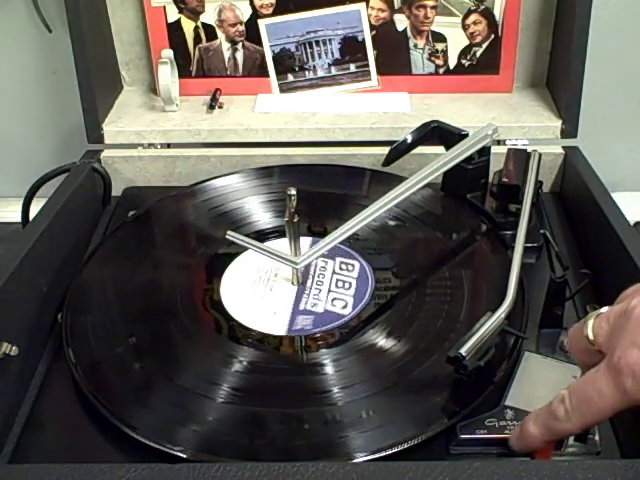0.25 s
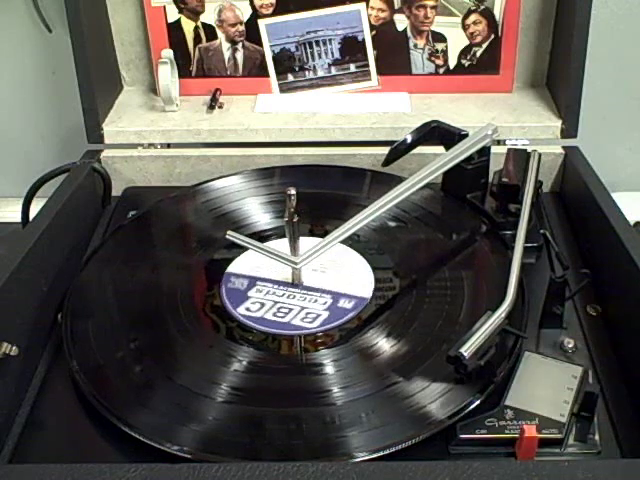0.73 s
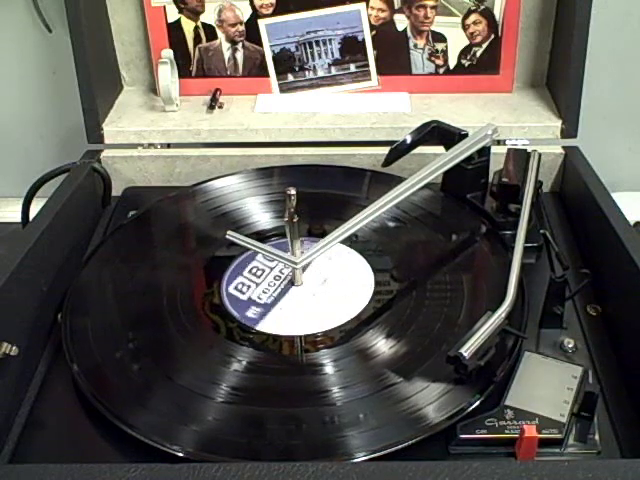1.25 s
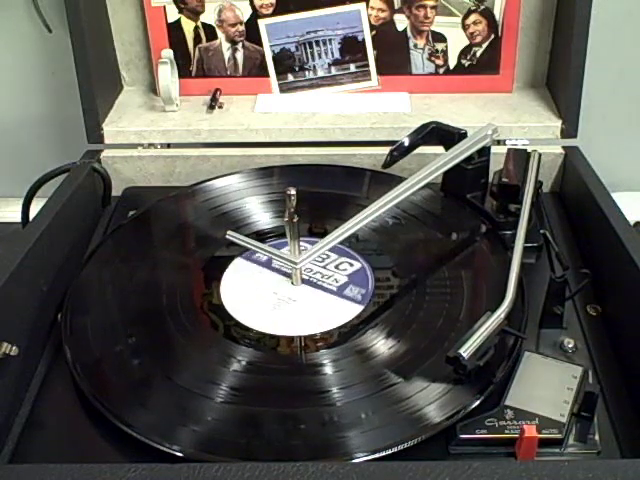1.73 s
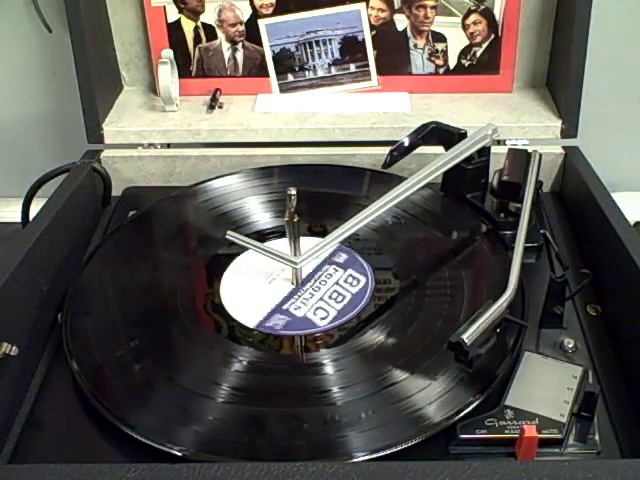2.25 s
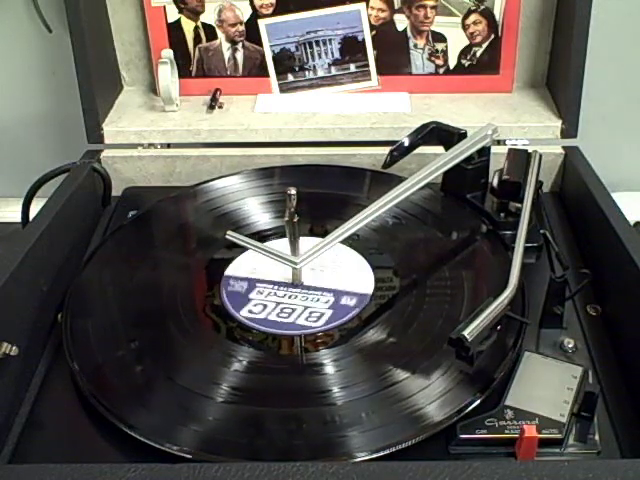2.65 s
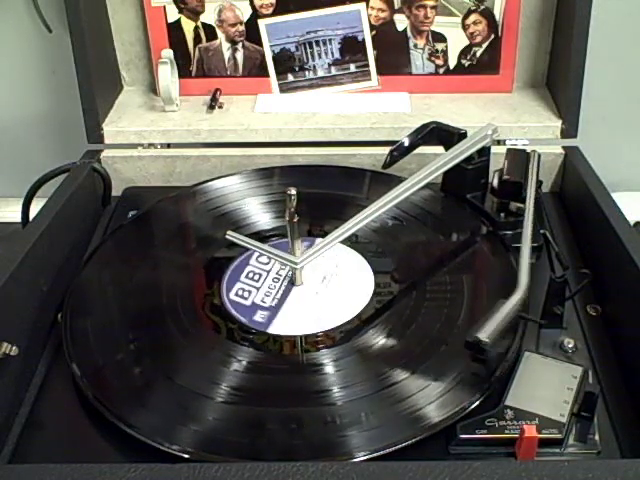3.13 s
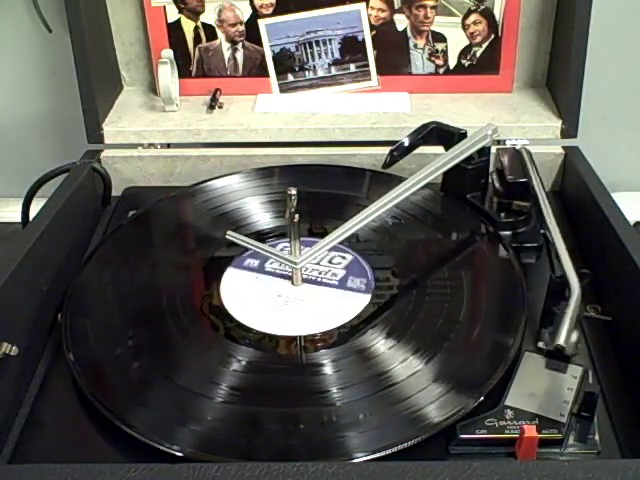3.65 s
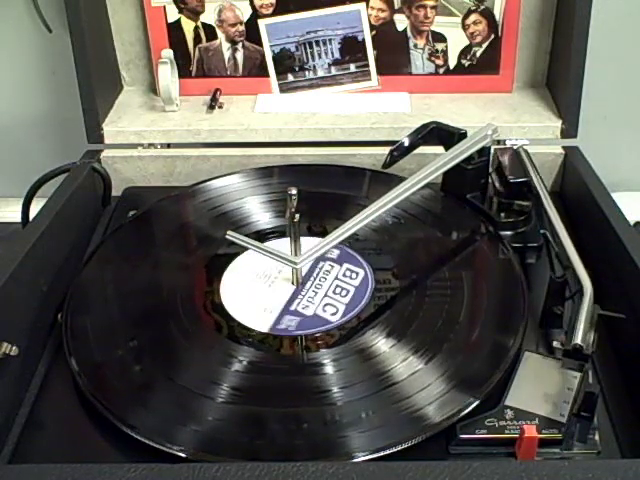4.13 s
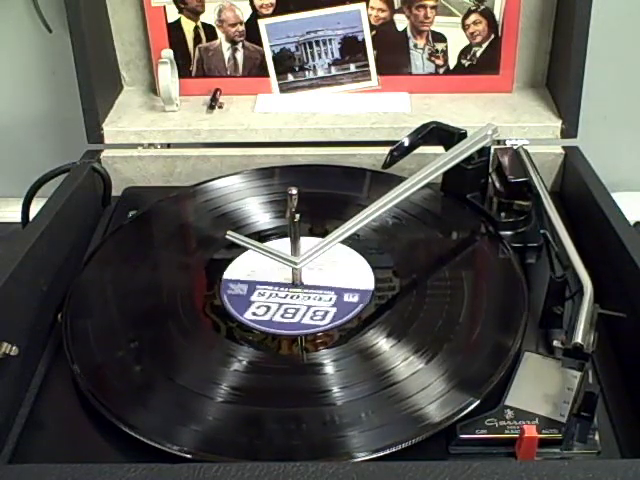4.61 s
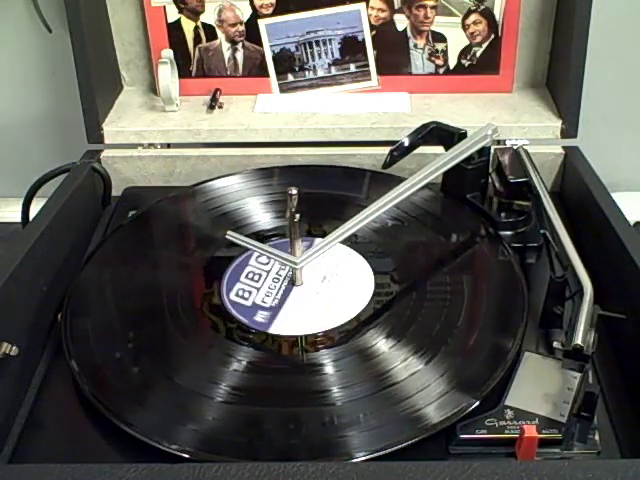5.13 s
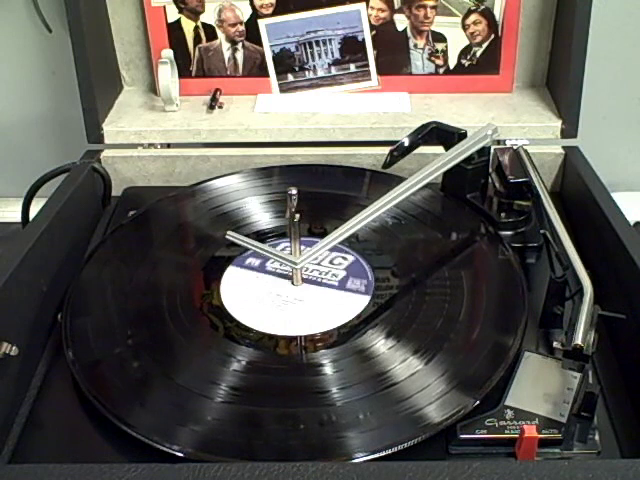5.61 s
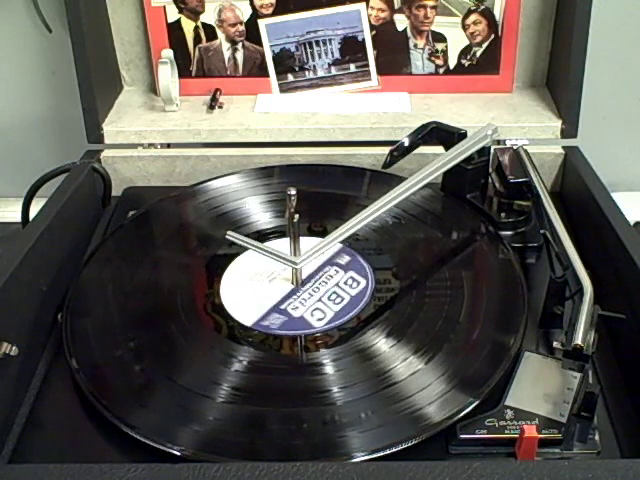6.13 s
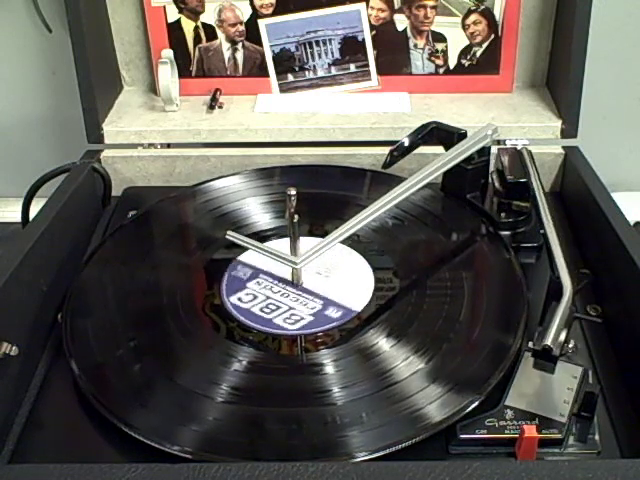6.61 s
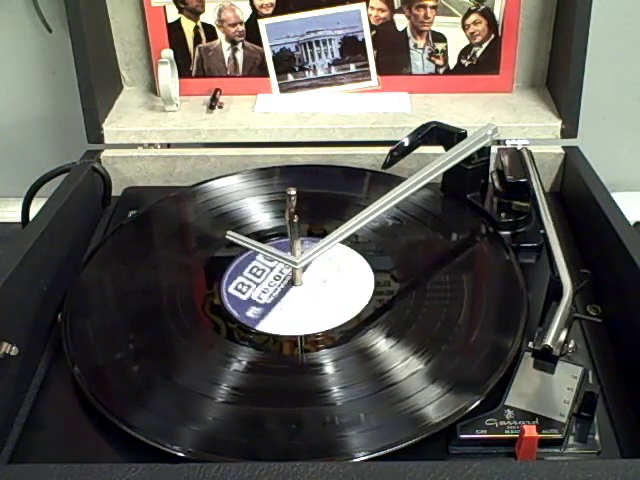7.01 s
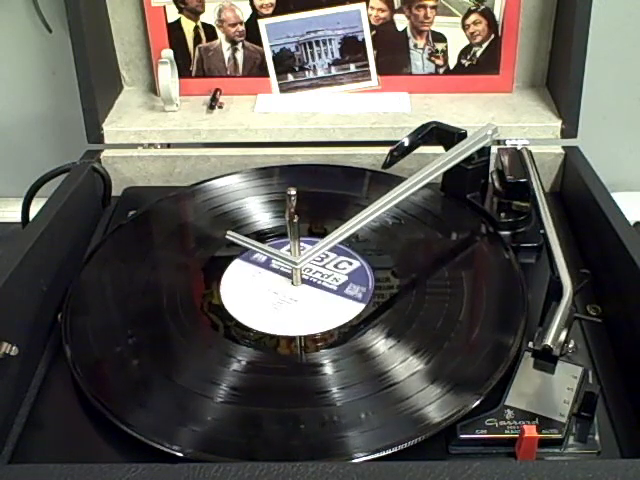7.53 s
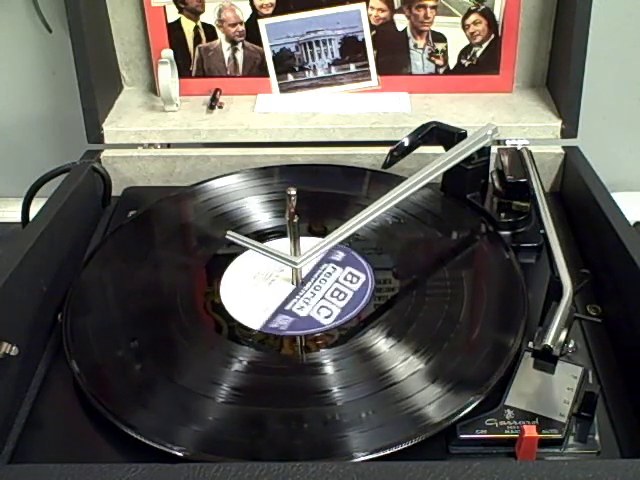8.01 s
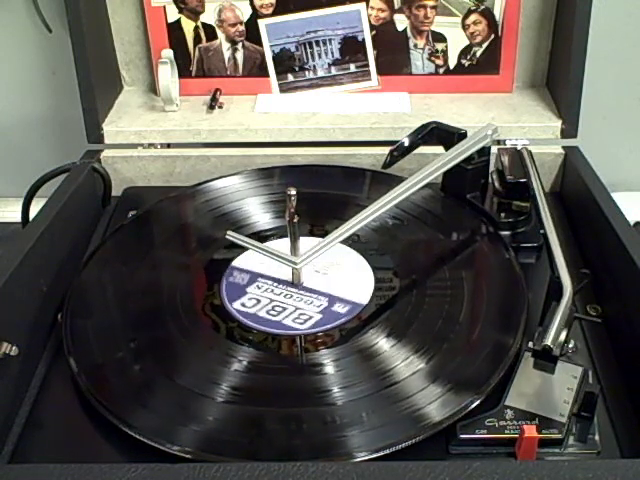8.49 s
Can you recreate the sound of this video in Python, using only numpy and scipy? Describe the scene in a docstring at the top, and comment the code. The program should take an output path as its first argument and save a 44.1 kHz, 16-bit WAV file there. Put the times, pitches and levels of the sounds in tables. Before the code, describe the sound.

Close indoors, small levers click over a grinding drive, followed by a dull thump, a bright arm clatter, a sharp snap and quiet humming.

```python
"""Automatic record deck returning its arm

A record deck runs through its return cycle, close to a small, nearly mono microphone indoors.
Levers tick, knock and rub, the sprung chassis thumps down, the arm clatters onto its rest and a latch snaps:
each blow mixes fading tones (modes) with fading, filtered noise. Below lie a humming, grinding drive made
of tones and filtered noise, a low drone of gliding tones, and microphone hiss made of filtered noise."""
import sys
import numpy as np
from scipy import signal
from scipy.fft import rfft, irfft
from scipy.io import wavfile

SR = 44100
rng = np.random.default_rng(int(sys.argv[2]) if len(sys.argv) > 2 else 0)


def dump_mix(stems):
    """Bounce the given channels to the path in sys.argv[1] as a 16-bit WAV at rate SR."""
    frames = np.atleast_2d(stems).T  # one column per channel
    limited = np.clip(frames, -1, 1)  # hard clip at full scale
    pcm = np.round(limited * 32767).astype(np.int16)
    wavfile.write(sys.argv[1], SR, pcm)


N = 386316
TIME = np.arange(N) / SR  # time of every sample, s
RING_S = np.arange(2 ** 15) / SR  # time since a blow, s

# ringing tones of the wooden case: (pitch [Hz], relative level [dB], time to fade by 60 dB [s])
CASE_MODES = [(135, -9, .1), (202, -4, .12), (295, 0, .12), (383, -3, .14), (466, -9, .1), (574, 0, .085),
              (660, -11, .06), (775, -19, .07), (854, -13, .08), (934, -14, .08)]
# ringing tones of the steel levers: (pitch [Hz], relative level [dB], time to fade by 60 dB [s])
LEVER_MODES = [(1317, -8, .07), (1606, 0, .06), (1799, -3, .08), (1937, -4, .1), (2166, -7, .09),
               (2309, -5, .09), (2726, -3, .1), (2972, -3, .11), (3122, -3, .1), (3272, -6, .1),
               (3700, -5, .12), (4606, -8, .06), (5380, -8, .05), (6378, -8, .05), (6880, -5, .07)]


def undb(db):
    """Turn decibels into a gain."""
    return 10 ** (np.asarray(db) / 20)


def unit(x):
    """Scale a sound to an rms (average strength) of 1."""
    return x / np.std(x)


def unit_attack(x):
    """Scale a blow to rms 1 over its first 10 ms."""
    attack = x[:SR // 100]
    return x / np.sqrt(np.mean(attack ** 2))


def curves(table):
    """Join the points of a table by straight lines: one value per sample for each column after the time."""
    times, *columns = np.transpose(table)
    return [np.interp(TIME, times, column) for column in columns]


def add(track, s, sound):
    """Mix a sound into the track at time s."""
    start = int(s * SR)
    track[start:start + len(sound)] += sound[:N - start]


def colour(x, points):
    """Filter a sound through (pitch [Hz], gain [dB]) points, with no response ahead of a blow."""
    hz, db = np.transpose(points)
    n = len(x)
    bins = np.maximum(np.fft.rfftfreq(n, 1 / SR), 1)
    gain_db = np.interp(np.log(bins), np.log(hz), db)
    # folding the cepstrum of the log gain onto positive times gives a minimum-phase filter
    cepstrum = irfft(np.log(undb(gain_db)), n)
    cepstrum[1:n // 2] *= 2
    cepstrum[n // 2 + 1:] = 0
    return irfft(rfft(x) * np.exp(rfft(cepstrum)), n)


def around(hz, below_db, above_db):
    """Filter points for a hump: flat for two thirds of an octave, sloping until two octaves either side."""
    return [(hz / 4, below_db), (hz / 1.25, 0), (hz * 1.25, 0), (hz * 4, above_db)]


def fade(t60):
    """Exponential decay that loses 60 dB in t60 seconds."""
    return np.exp(-np.log(1000) * RING_S / t60)


def modes(table, scatter_db=0, detune=0):
    """Fading tones of a struck body; each blow can vary their shares and, slightly, their pitches."""
    chance = rng.standard_normal((len(table), 2))
    ring = np.zeros(len(RING_S))
    for k, ((hz, db, t60), (level_luck, pitch_luck)) in enumerate(zip(table, chance)):
        tone = np.sin(2 * np.pi * hz * (1 + detune * pitch_luck) * RING_S)
        sign = (-1) ** k  # neighbours start in opposite directions
        ring += sign * undb(db + scatter_db * level_luck) * fade(t60) * tone
    return unit_attack(ring)


def clank(spectrum, t60, crack):
    """Filtered noise stands for countless close modes fading together, led by the crack of the contact."""
    ring = unit_attack(rng.standard_normal(len(RING_S)) * fade(t60))
    ring[0] += crack * np.sqrt(SR / 100)  # a single-sample click
    return unit_attack(colour(ring, spectrum))


def knock(centre_hz):
    """The wooden case swells into its ring; the place of the contact favours the modes near one pitch."""
    # how well a knock reaches the case: (pitch [Hz], gain [dB])
    knock_colour = [(135, -1.5), (200, 2.5), (295, 0.5), (383, -7), (466, 1.5), (574, 1), (700, -10),
                    (950, -1)]
    favour_db_per_octave = 13  # modes away from the centre ring less
    favoured = []
    for hz, db, t60 in CASE_MODES:
        octaves_away = abs(np.log2(hz / centre_hz))
        favoured.append((hz, db - favour_db_per_octave * octaves_away, t60))
    ring = modes(favoured, scatter_db=2, detune=.012)
    swell = 1 - fade(0.041)
    return unit_attack(swell * colour(ring, knock_colour))


def load():
    """Load on the drive, 0-1, easing from one stage of the cycle to the next."""
    # the lever is pushed, the drive idles round to the cam, the cam strains until the chassis drops,
    # the arm is swung, the drive runs free: (start [s], load [0-1])
    stages = [(0, .9), (.45, 0.7), (.9, 1), (2.05, .22), (3.6, 0)]
    settle_s = .13  # time constant of the easing
    effort = np.full(N, float(stages[0][1]))
    for s, share in stages[1:]:
        effort = share + (effort - share) * np.exp(-np.maximum(TIME - s, 0) / settle_s)
    return np.clip(effort, 0, 1)


def crackle(per_second):
    """Dry joints slip at random moments; each tiny slip is a burst of noise that dies away quickly."""
    slips = (rng.random(N) < per_second / SR) * undb(4 * rng.standard_normal(N))
    envelope = signal.fftconvolve(slips, fade(0.07))[:N]
    spectrum = [(800, -12.5), (2200, -6.5), (4400, 2.5), (5500, -7), (7200, -2.5), (10000, -12.5), (16000, -12)]
    return unit(colour(envelope * rng.standard_normal(N), spectrum))


def drive():
    """The motor hums steadily; grinding on the case, crackle and deep rumble grow with the load."""
    # motor hum: (pitch [Hz], rms level [dB])
    hum_lines = [(100, -76), (250, -76.5), (300, -76), (347, -76)]
    effort = load()

    def gain(free_db, loaded_db):
        """Level between running free and full load."""
        return undb(free_db + (loaded_db - free_db) * effort)

    # wheel and cam rub in grains whose strength changes every 1024 samples, and set the case ringing
    block_db = 3 * np.repeat(rng.standard_normal(N // 1024 + 1), 1024)[:N]
    grains = rng.standard_normal(N) * undb(block_db)
    grind = signal.fftconvolve(grains, modes(CASE_MODES))[:N]
    grind = colour(grind, [(130, -2.5), (260, 7.5), (400, -10), (600, 0), (1000, -12.5)])
    rumble = colour(rng.standard_normal(N), [(10, -19.0), (30, -0.5), (58, 5.0), (105, 0.5),
                                             (150, -16.0), (300, -27.0), (1000, -53)])
    hum = sum(undb(db) * np.sqrt(2) * np.sin(2 * np.pi * hz * TIME) for hz, db in hum_lines)

    out = gain(free_db=-77.5, loaded_db=-56) * unit(grind)
    out += gain(free_db=-79.5, loaded_db=-65) * crackle(per_second=57)
    out += gain(free_db=-59, loaded_db=-51) * unit(rumble)
    return out + hum


def waver(db, per_second):
    """A gain that wanders at random by about db decibels."""
    steps = rng.standard_normal(256)
    return undb(db * np.interp(TIME * per_second, np.arange(len(steps)), steps))


def drone():
    """A deep tone and its octave sink and climb again, like a far engine heard through the walls."""
    # path of the drone before its waver:
    # (time [s], pitch [Hz], level of the deep tone [dB], level of the octave [dB])
    path = [(0, 64.3, -50, -74), (.65, 68.5, -47, -71), (1.15, 60, -45.5, -64), (1.7, 59.95, -53, -57.5),
            (2.3, 53.3, -50.5, -69), (2.6, 48.6, -74, -77), (2.9, 44.8, -54, -63.5), (3.42, 31.7, -49, -55),
            (3.62, 30.3, -67, -67), (4.46, 26.85, -61.5, -64), (5.1, 31.07, -62, -55),
            (5.22, 44.7, -48.5, -63), (5.75, 37.66, -50.5, -63), (6.15, 40.15, -53, -48.5),
            (6.45, 44.14, -48, -59.5), (6.9, 47.44, -57, -58.5), (8.38, 55.8, -59, -57),
            (8.62, 58.4, -45.5, -59.5)]
    # weaker lines on both sides of the octave: (multiple of the pitch, level against the octave [dB])
    side_lines = [(1.75, -7), (2.25, -9)]
    hz, first_db, octave_db = curves(path)
    phase = 2 * np.pi * np.cumsum(hz) / SR

    def line(multiple):
        """One tone, wavering in level on its own."""
        return np.sqrt(2) * waver(db=2, per_second=7) * np.sin(multiple * phase)

    octave = line(2) + sum(undb(db) * line(multiple) for multiple, db in side_lines)
    return undb(first_db) * line(1) + undb(octave_db) * octave


def hiss():
    """Smooth microphone hiss: filtered noise at a steady level."""
    # colour of the hiss: (pitch [Hz], relative level [dB])
    hiss_colour = [(88, -27), (150, -1), (217, -8.5), (291, -2), (376, -11), (398, -11.5), (774, -12),
                   (1060, -16), (2220, -16), (3100, -19), (14000, -21.5), (16000, -20.5)]
    return undb(-60.5) * unit(colour(rng.standard_normal(N), hiss_colour))


def lever_clicks(rows):
    """Each small contact rings the steel, rebounds a moment later, ticks in the treble and knocks the case."""
    # colour of the treble tick: (pitch [Hz], relative level [dB])
    tick_colour = [(1500, -21), (4000, -11.5), (7000, -0.5), (10000, -6.5), (13500, -5), (16000, -19)]
    # a harder contact rings the steel higher: centre when tick and steel are equal, and the
    # hardness that raises it by an octave
    equal_hz, hardness_db_per_octave = 3020, 24.5
    steel_colour = [(200, -4.5), (900, 2.5), (1400, 8.0), (16000, 5.0)]
    out = np.zeros(N)
    for s, steel_db, hardness_db, case_db, case_hz in rows:
        steel_hz = equal_hz * 2 ** (hardness_db / hardness_db_per_octave)
        ring = modes(LEVER_MODES, scatter_db=4, detune=.03)
        steel = clank(steel_colour, t60=0.058, crack=0.091) + undb(-17) * ring
        steel = colour(steel, around(steel_hz, below_db=-12, above_db=-22.5))
        steel = undb(steel_db) * unit_attack(steel)
        rebound_s = s + rng.uniform(0.00158, 0.0049)
        tick = clank(tick_colour, t60=0.048, crack=0.39)
        add(out, s, steel)
        add(out, rebound_s, undb(-19.5) * steel)
        add(out, s, undb(steel_db + hardness_db) * tick)
        add(out, s, undb(case_db) * knock(case_hz))
    return out


def stray_clicks(hardness_db):
    """Rows of faint clicks that come at random, more often under load."""
    per_second = 5  # under full load
    steel_db, case_db, spread_db, case_hz = -67.5, -55.5, 3, 275  # typical levels at full load
    times = np.flatnonzero(rng.random(N) < per_second * load() / SR) / SR
    spread = spread_db * rng.standard_normal((len(times), 2))
    return [(s, steel_db + a, hardness_db, case_db + b, case_hz) for s, (a, b) in zip(times, spread)]


def rubs():
    """Parts slide in tiny uneven slips, each stroke ringing one resonance of the linkage."""
    # rubs and squeaks, levels before the stroke shapes them:
    # (time [s], length [s], centre [Hz], width [Hz], level [dB])
    strokes = [(0.182, 0.069, 1900, 900, -55.5), (2.271, .06, 2050, 220, -57), (2.275, 0.072, 420, 35, -56),
               (2.344, 0.077, 2370, 1000, -62.5), (2.42, 0.68, 2170, 300, -72), (3.12, 0.43, 488, 170, -58),
               (3.349, 0.048, 2735, 1300, -57), (6.352, 0.058, 2320, 2000, -61.5),
               (7.373, .05, 2270, 1200, -66), (8.35, 0.073, 3000, 2000, -67)]
    out = np.zeros(N)
    for s, length, hz, width_hz, db in strokes:
        slips = rng.standard_normal(len(RING_S)) * undb(12 * rng.standard_normal(len(RING_S)))
        ring = RING_S * np.exp(-np.pi * width_hz * RING_S) * np.cos(2 * np.pi * hz * RING_S)
        squeak = unit(signal.fftconvolve(slips, ring)[:len(RING_S)])
        # swells quickly, sinks more slowly
        stroke = np.sin(np.pi * np.sqrt(np.minimum(RING_S / length, 1)))
        add(out, s, undb(db) * stroke * squeak)
    return out


def chassis_drop():
    """The chassis falls onto its springs and booms in the case, which it damps as it settles."""
    # light knocks ahead of the drop, then the drop and its bounces;
    # spring and case levels are those before the boom is filtered:
    # (time [s], spring level [dB], case level [dB], steel level [dB])
    blows = [(1.9140, -27, -61, -61), (1.976, -33, -35, -65), (1.9893, -18, -17.5, -25),
             (1.9932, -47, -50, -44), (1.9995, -18, -19, -32.5), (2.0102, -31, -33, -37)]
    # ringing tones of the springs: (pitch [Hz], relative level [dB], time to fade by 60 dB [s])
    spring_modes = [(59.6, 7, 0.32), (86, -10.5, 0.3), (107.5, 6.5, 0.074)]
    # colour of the chassis steel: (pitch [Hz], relative level [dB])
    chassis_colour = [(300, 6), (800, 1.5), (1200, 1.5), (1600, -3.5), (2000, 3.5), (2400, 2.5),
                      (3200, -11), (4700, -13), (5600, -28), (7000, -15.5), (8500, -28.5), (16000, -35)]
    out = np.zeros(N)
    for s, spring_db, case_db, steel_db in blows:
        damped_case = modes(CASE_MODES) * fade(0.13)
        boom = undb(spring_db) * modes(spring_modes) + undb(case_db) * damped_case
        add(out, s, colour(boom, [(10, -13), (28, -15), (50, 3.5), (1000, -1.0)]))
        add(out, s, undb(steel_db) * clank(chassis_colour, t60=0.06, crack=1.4))
    return out


def arm_landing():
    """The metal arm strikes its rest several times within a moment and rings brightly."""
    # the strikes, each with the level of its noisy clank: (time [s], level [dB])
    strikes = [(3.7185, -25), (3.7268, -20.5), (3.7326, -16), (3.7410, -27), (3.7505, -45.5), (3.7855, -55)]
    # ringing tones of the arm: (pitch [Hz], relative level [dB], time to fade by 60 dB [s])
    arm_modes = [(1946, -9, .14), (2584, -6, .15), (2798, -5, .16), (3140, -7, .18), (3321, -8, .14),
                 (3571, -8, .12), (3708, -2, .13), (3911, -2, .12), (4207, -7, .12), (4296, -6, .09),
                 (4643, -11, .14), (4839, -10, .15), (5358, -9, .13), (5590, -9, .13), (5866, -7, .13),
                 (7171, -11, .1), (8091, -9, .08), (10200, -10, .1), (12600, -6, .09), (13900, -2, .12)]
    # colour of the arm's noisy clank: (pitch [Hz], relative level [dB])
    arm_colour = [(130, -48.5), (270, -18), (500, -14.5), (750, -20), (1250, -23), (1900, -7), (2400, -5.5),
                  (3800, -4), (4700, -9), (9000, -13.5), (10300, -10), (11600, -16), (14000, -8),
                  (16000, -27)]
    out = np.zeros(N)
    for s, db in strikes:
        ring = undb(-11.5) * modes(arm_modes, scatter_db=1.5, detune=.001)
        blow = clank(arm_colour, t60=0.048, crack=0.13) + ring
        add(out, s, undb(db) * (blow + undb(-22.5) * knock(centre_hz=607)))
    return out


def latch_snap():
    """A sprung lever snaps home against the chassis, shakes the case and leaves the linkage rattling briefly."""
    # the snap and its rebound, each with the level of its noisy clank: (time [s], level [dB])
    snaps = [(4.86, -23.5), (4.8634, -29.5)]
    # colour of the latch's noisy clank: (pitch [Hz], relative level [dB])
    latch_colour = [(200, -28), (450, -18), (900, -14), (1200, -8), (1600, 3), (2400, -2), (2900, 3.5),
                    (3500, -7), (5800, -13.5), (6900, -4), (7400, -13.5), (8700, -9.5), (10500, -22),
                    (16000, -19)]
    rattle_colour = [(500, -22), (1100, -5), (1700, -6), (3700, 1), (4600, -12), (16000, -27)]
    out = np.zeros(N)
    for s, db in snaps:
        blow = clank(latch_colour, t60=0.041, crack=0.31) + undb(-11.0) * modes(LEVER_MODES)
        rattle = clank(rattle_colour, t60=0.18, crack=0)
        add(out, s, undb(db) * (blow + undb(-18.5) * rattle + undb(-26.5) * knock(centre_hz=423)))
    return out


def room(x):
    """A small furnished room answers with a short, quiet tail, made of fading filtered noise."""
    # colour of the room's answer: (pitch [Hz], relative level [dB])
    room_colour = [(100, -3), (600, -7.5), (1500, -5), (3300, -8.5), (6000, -6.5), (16000, -15)]
    swell_and_fade = fade(0.2) - fade(0.027)
    tail = colour(rng.standard_normal(len(RING_S)) * swell_and_fade, room_colour)
    return undb(-20) * signal.fftconvolve(x, tail / np.linalg.norm(tail))[:N]


def channel_noise():
    """The faint electrical noise of one channel, mostly low in pitch."""
    # colour of the noise: (pitch [Hz], relative level [dB])
    noise_colour = [(15, 1.5), (60, -7), (120, 15.5), (250, -1.5), (1000, -46.5), (4000, -51.5),
                    (16000, -32)]
    return undb(-65.5) * unit(colour(rng.standard_normal(N), noise_colour))


def scene():
    """The deck and its room reach both channels alike; each channel adds its own trace of noise."""
    # lever clicks, hardness being the treble tick's level over the steel's:
    # (time [s], steel level [dB], hardness [dB], case level [dB], case centre [Hz])
    click_rows = [(0.036, -50.5, -5.5, -41.5, 204), (0.087, -55, -1, -72, 220),
                  (0.162, -64, -7, -47.5, 220), (0.187, -46, -4.5, -65, 300), (0.377, -54, -6.5, -56, 570),
                  (0.4, -37, 0.5, -40, 575), (0.867, -57, 0.5, -72, 585), (0.904, -47.5, -12, -41.5, 574),
                  (0.91, -45.5, 1, -45.5, 400), (0.939, -65, -2, -41, 229), (1.029, -40.5, -14, -44, 227),
                  (1.056, -57, 5.5, -50, 217), (1.224, -51, -34, -67, 288), (1.233, -51, 4, -51, 295),
                  (1.258, -51, -1, -49.5, 312), (1.316, -68, -7, -53, 400), (1.394, -42, -2.5, -43, 369.6),
                  (1.533, -50, -11, -45.5, 224.3), (1.788, -56.5, -8, -46, 258), (1.87, -58, -3, -66, 270),
                  (1.904, -52.5, -12, -40.5, 516), (3.006, -57, -7, -66, 518), (3.19, -64, -12, -49, 330),
                  (3.245, -54.5, -18, -50.5, 332.5), (3.326, -66, -6, -58, 400),
                  (3.705, -58, -10, -44, 460), (3.857, -55, -8, -46.5, 484), (4.645, -59, 4.5, -66, 434),
                  (5.398, -45, -26, -71, 352), (5.443, -51.5, -34, -65, 449), (5.723, -53.5, 0.5, -49, 382),
                  (5.745, -44, -29, -48.5, 293), (5.949, -60.5, -15, -55.5, 350.6),
                  (6.566, -63.5, -17, -52.5, 430), (6.686, -52, 5.5, -78, 357), (7.418, -53, -11, -76, 270)]
    strays = load() * lever_clicks(stray_clicks(hardness_db=-1))  # also louder under load
    clicks = lever_clicks(click_rows) + strays
    blows = clicks + rubs() + chassis_drop() + arm_landing() + latch_snap()
    mono = drive() + drone() + hiss() + blows + room(blows)
    return np.array([mono + channel_noise() for _ in range(2)])


def record(dry):
    """The converter cuts the top and sits slightly off zero."""
    top_hz = 15850
    offset = np.array([[.0053], [.0095]])  # left and right, as a share of full scale
    low_pass = signal.ellip(10, .2, 80, top_hz, fs=SR, output="sos")
    return signal.sosfilt(low_pass, dry) + offset


dry = scene()
out = record(dry)
dump_mix(out)
```